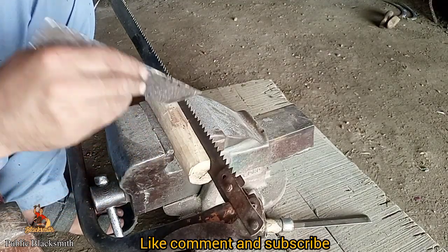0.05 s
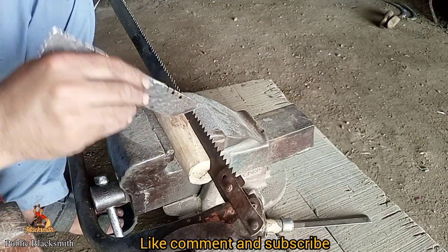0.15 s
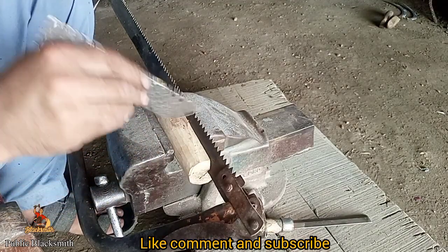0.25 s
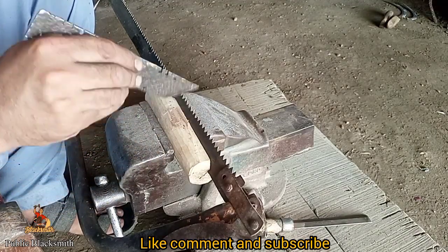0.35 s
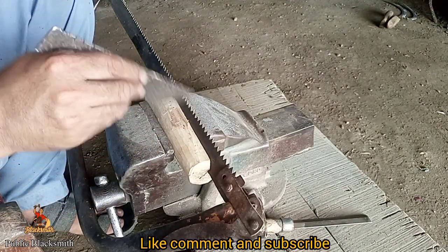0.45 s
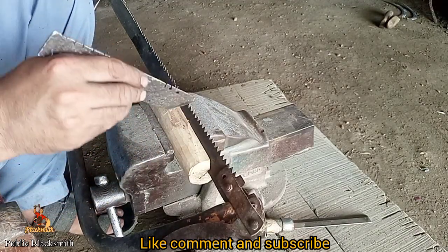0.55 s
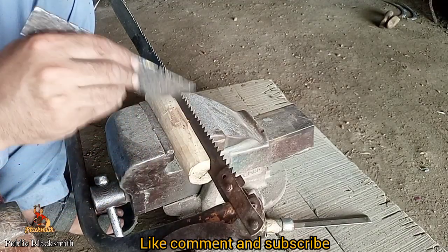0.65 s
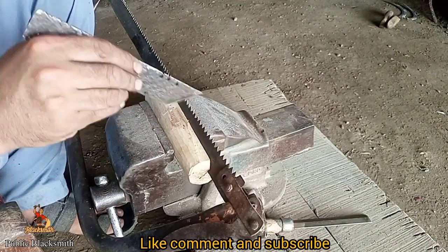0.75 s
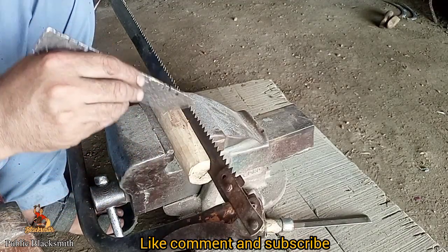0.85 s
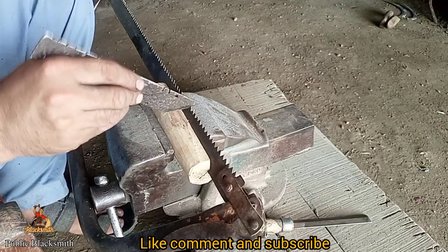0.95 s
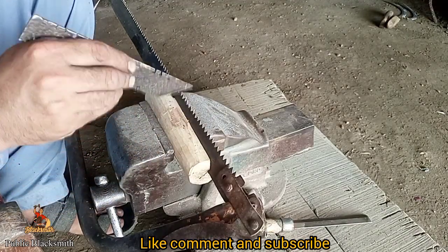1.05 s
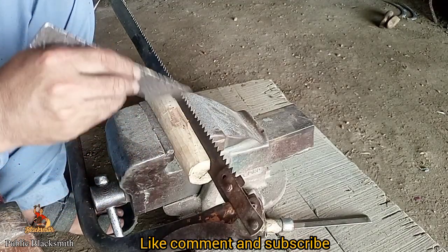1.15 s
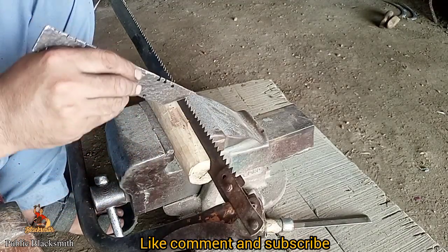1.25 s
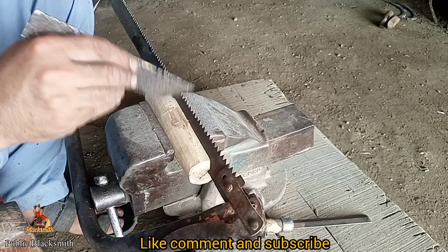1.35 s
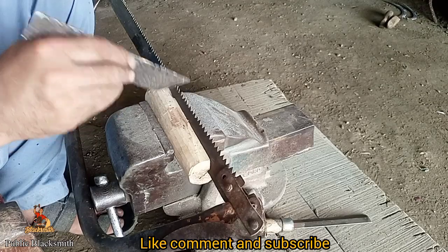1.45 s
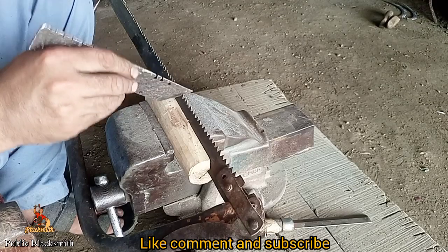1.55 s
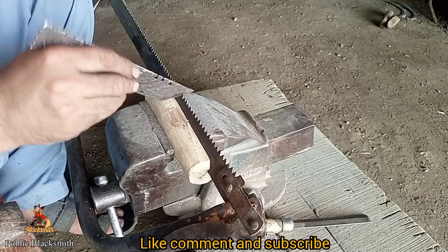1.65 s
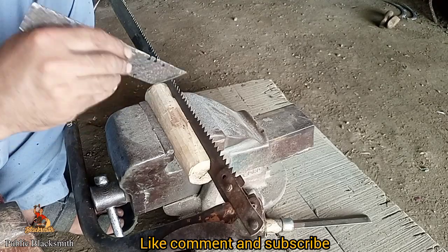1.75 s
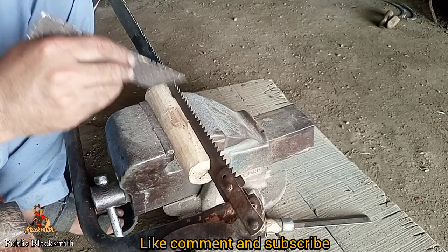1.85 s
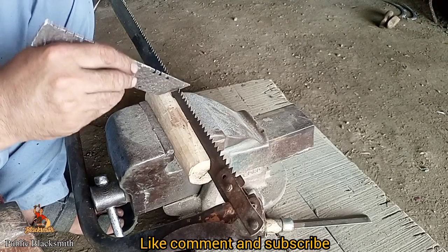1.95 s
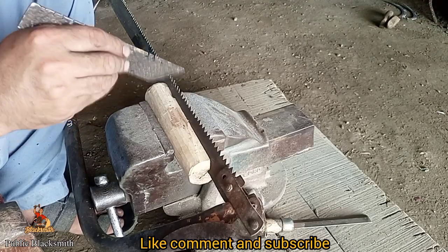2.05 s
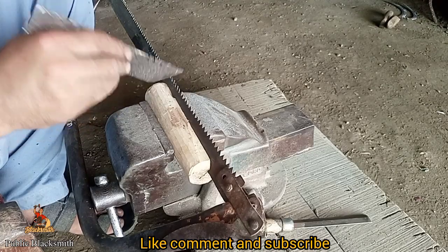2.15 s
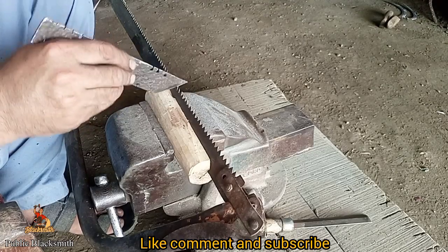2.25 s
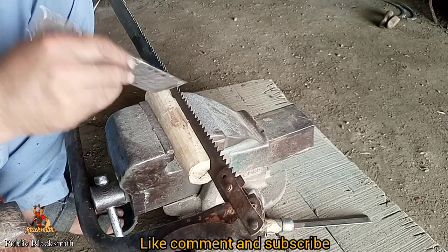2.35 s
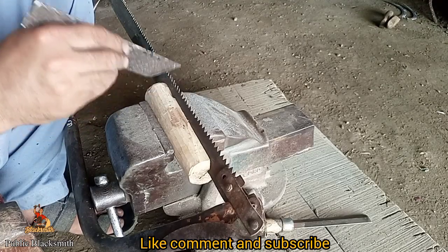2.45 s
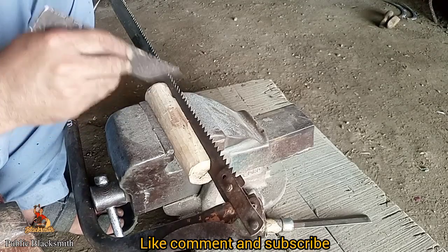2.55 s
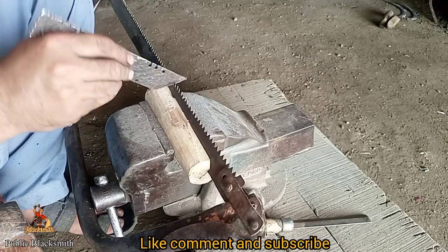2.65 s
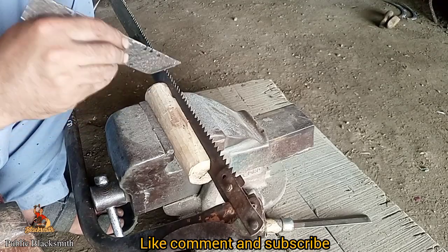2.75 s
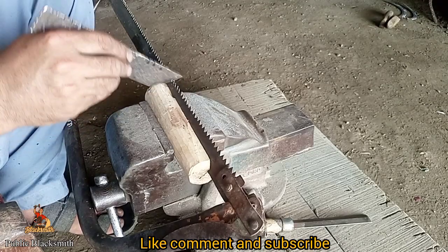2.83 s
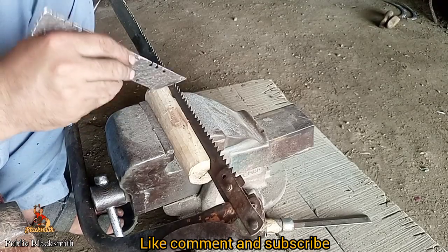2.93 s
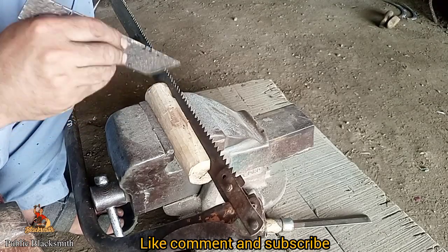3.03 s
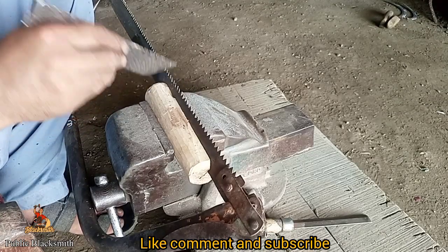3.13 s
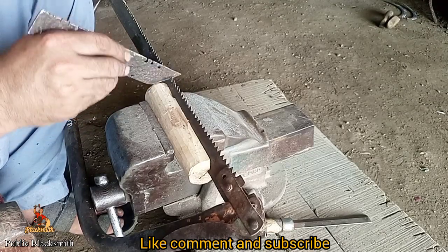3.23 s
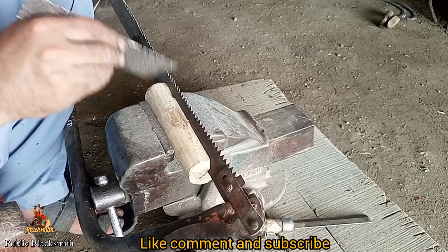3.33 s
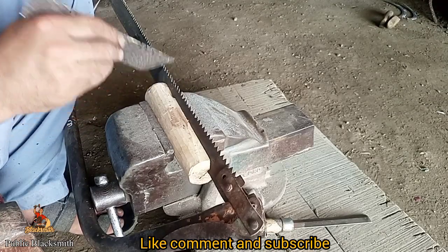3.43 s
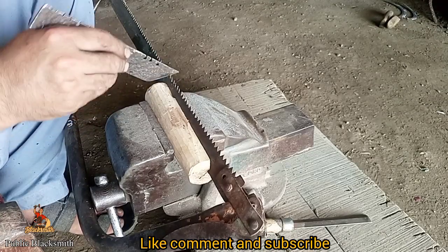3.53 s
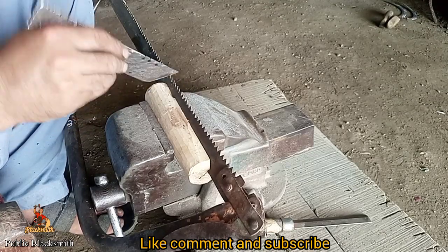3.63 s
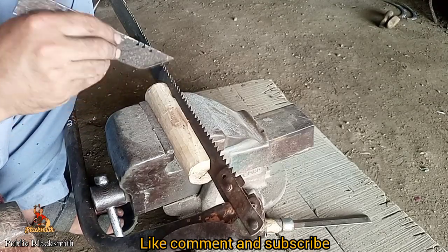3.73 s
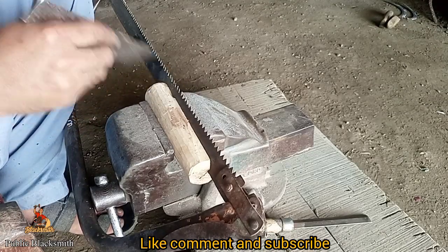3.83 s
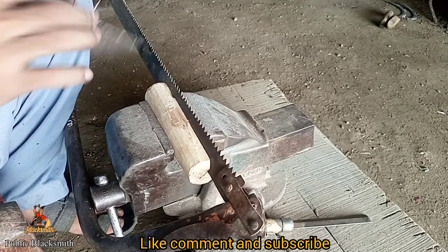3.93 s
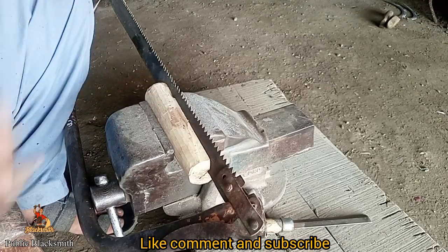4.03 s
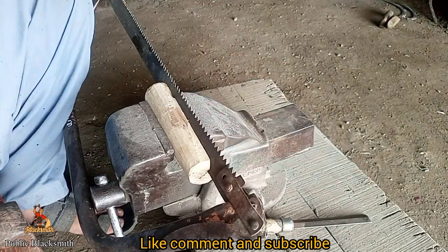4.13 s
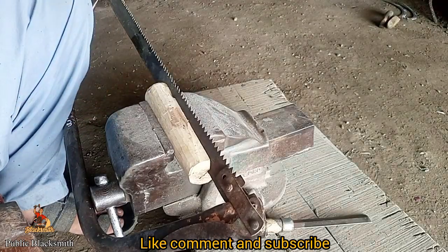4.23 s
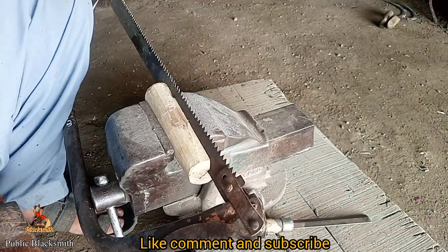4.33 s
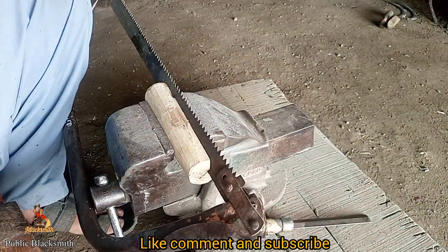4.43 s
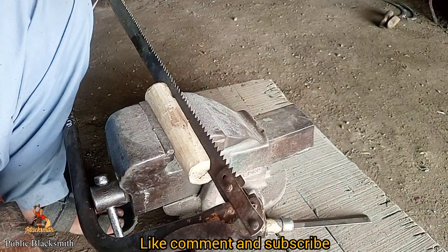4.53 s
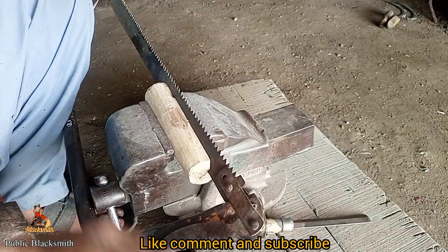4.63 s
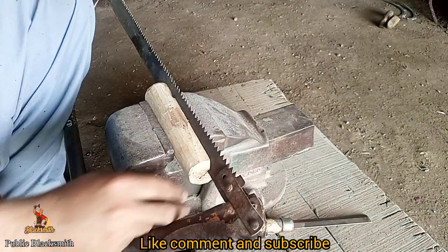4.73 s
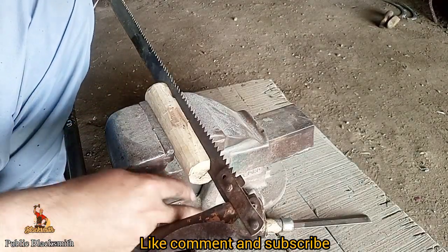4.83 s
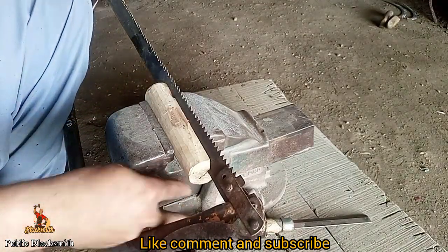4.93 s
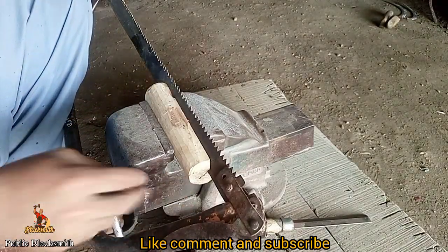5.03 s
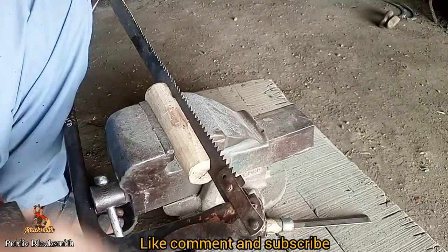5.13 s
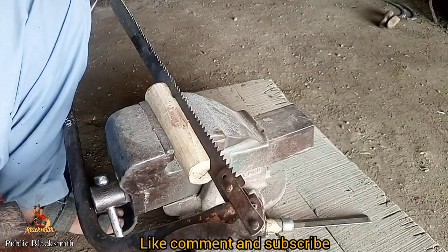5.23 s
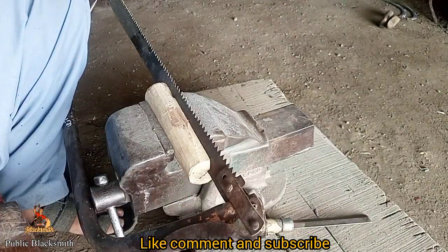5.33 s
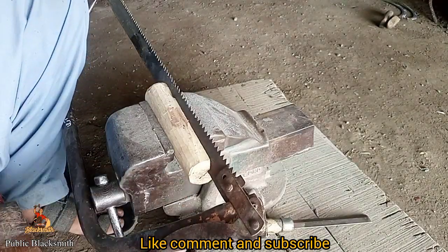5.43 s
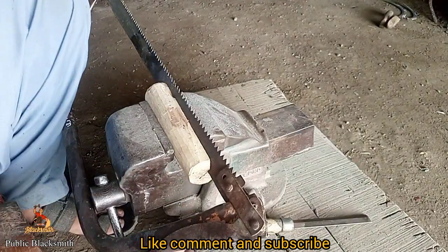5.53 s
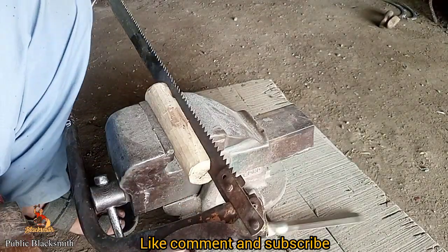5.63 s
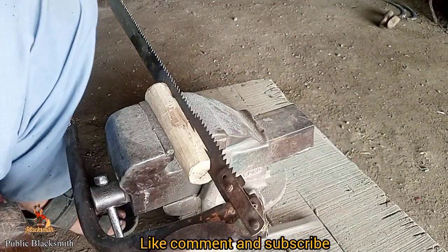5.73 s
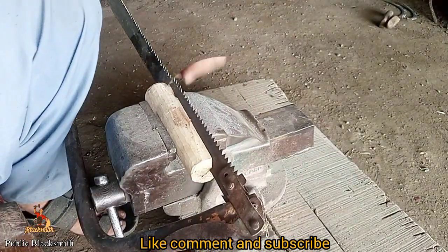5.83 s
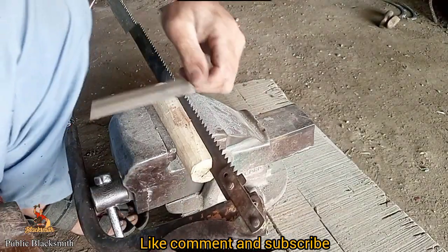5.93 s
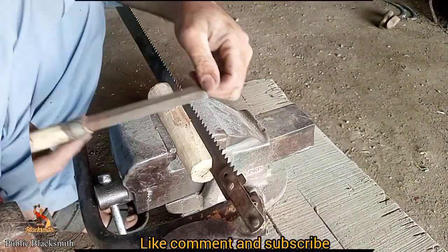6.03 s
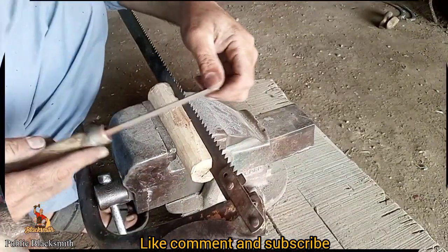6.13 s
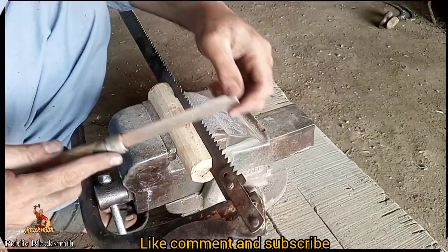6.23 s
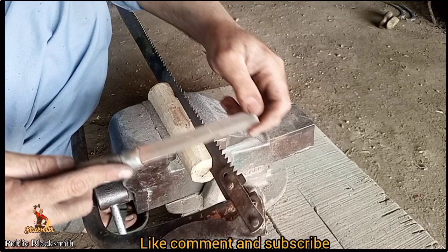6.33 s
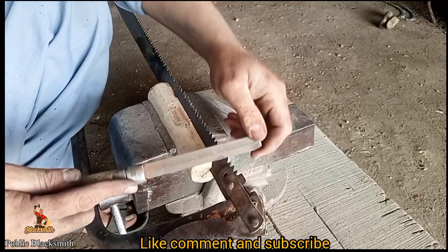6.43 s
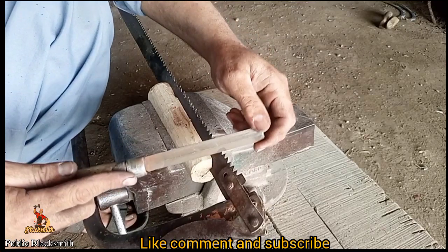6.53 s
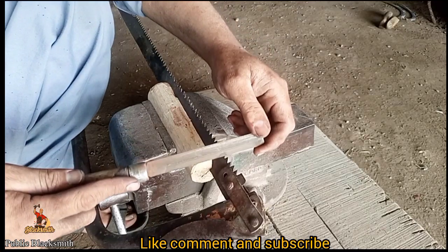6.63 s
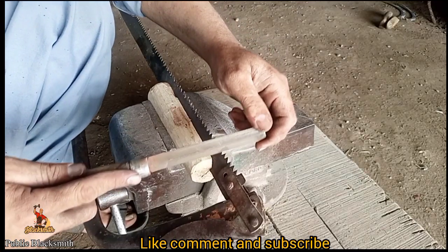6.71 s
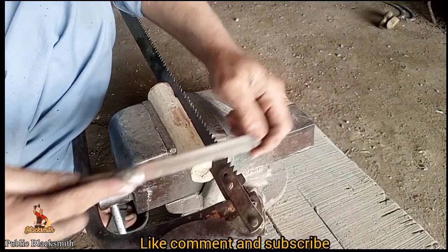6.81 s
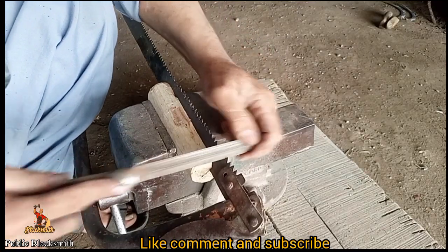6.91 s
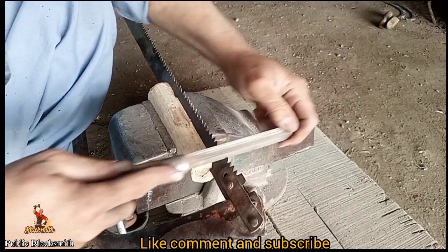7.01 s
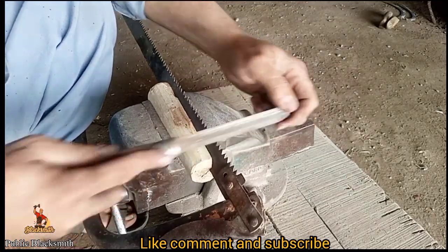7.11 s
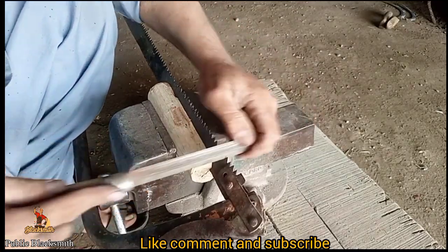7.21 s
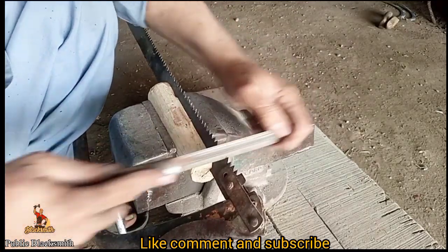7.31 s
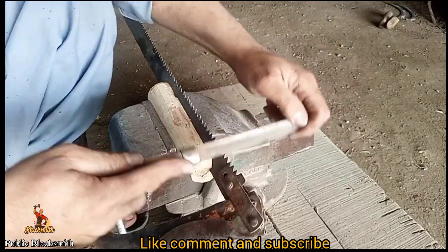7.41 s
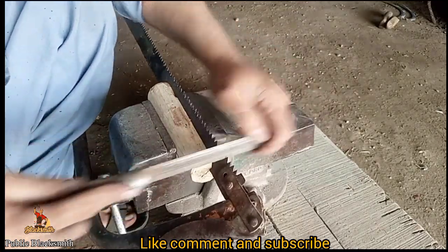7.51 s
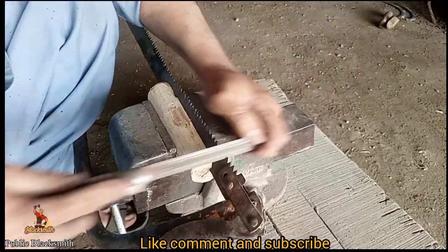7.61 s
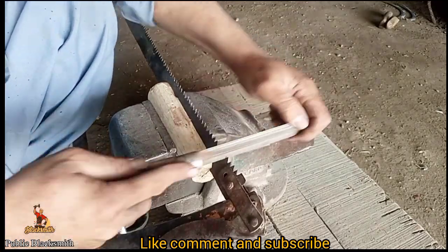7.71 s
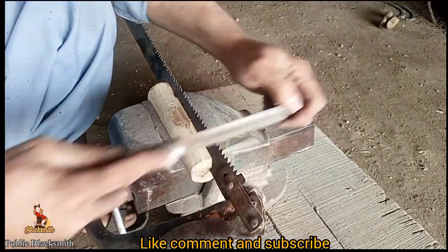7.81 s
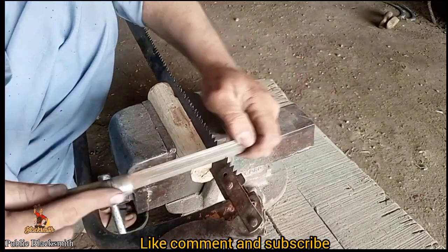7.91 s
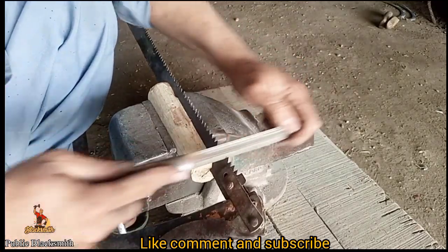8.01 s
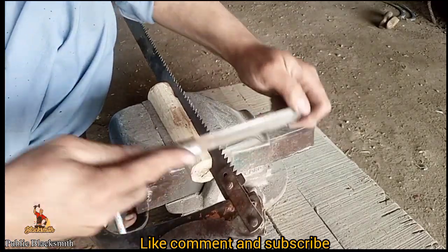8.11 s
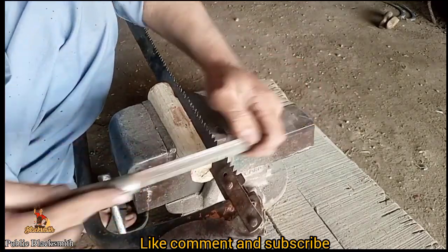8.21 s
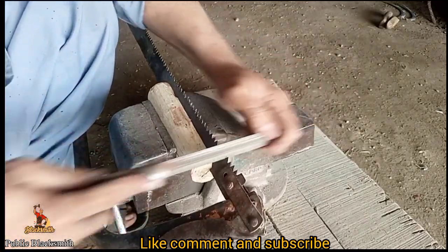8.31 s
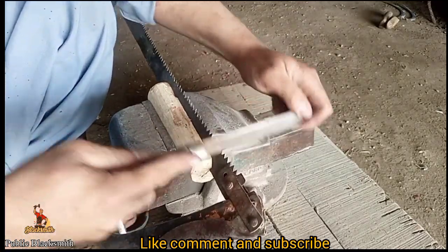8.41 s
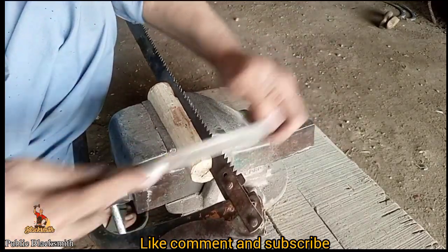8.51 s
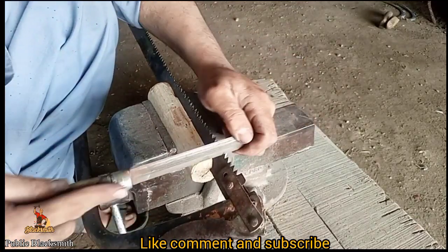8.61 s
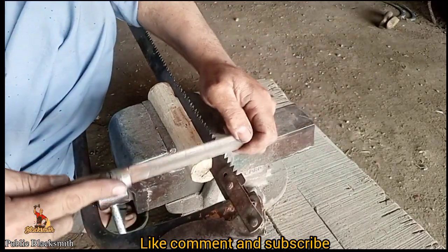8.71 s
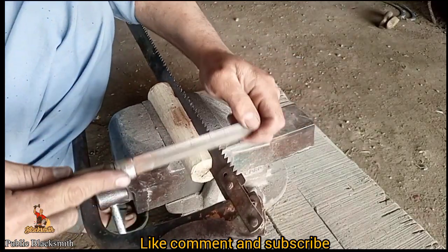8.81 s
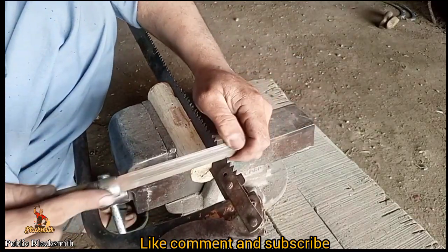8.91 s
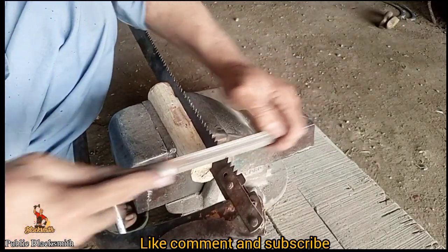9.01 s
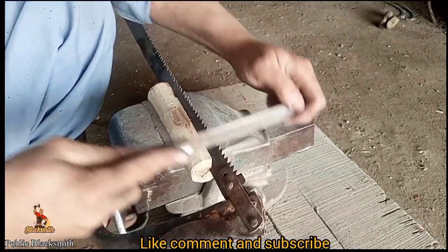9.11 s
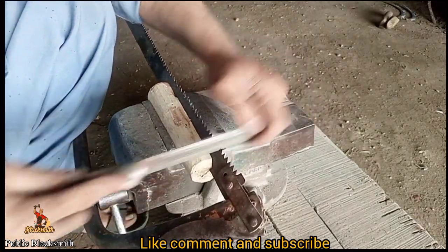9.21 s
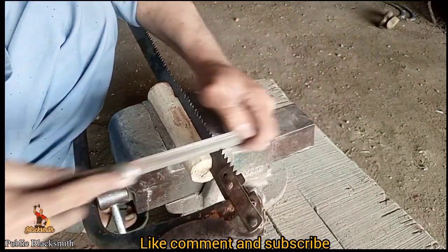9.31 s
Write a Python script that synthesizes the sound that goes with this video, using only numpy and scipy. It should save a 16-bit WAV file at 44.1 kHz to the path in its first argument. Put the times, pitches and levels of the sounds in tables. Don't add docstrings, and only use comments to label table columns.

```python
import sys
import numpy as np
from scipy import signal
from scipy.fft import rfft, irfft, next_fast_len
from scipy.io import wavfile
from scipy.ndimage import map_coordinates

SR = 44100
rng = np.random.default_rng(int(sys.argv[2]) if len(sys.argv) > 2 else 0)


def volts_from_db(level):
    exponent = np.asarray(level, float) / 20
    return 10 ** exponent


def persist_wave(psi):
    counts = np.round(np.clip(psi, -1, 1) * 32767).astype(np.int16)
    wavfile.write(sys.argv[1], SR, np.atleast_2d(counts).T)


N = 412776
SPAN = 12288
HZ = np.fft.rfftfreq(SPAN, 1 / SR)


def unit(x):
    return x / np.sqrt(np.mean(x ** 2) + 1e-30)


def along(points, hz):
    point_hz, point_db = np.transpose(points)
    return np.interp(np.log(hz + 1), np.log(point_hz + 1), point_db)


def add(track, start_s, piece):
    part = track[round(start_s * SR):][:len(piece)]
    part += piece[:len(part)]


def wobble(count, rate_hz):
    knots = rng.standard_normal(count // 20 + 8)
    return map_coordinates(knots, [np.arange(count) * rate_hz / SR])


def smooth(x, time_s):
    step = 1 / (time_s * SR)
    return signal.lfilter([step], [1, step - 1], x)


def noise(points):
    count = next_fast_len(N)
    colour = volts_from_db(along(points, np.fft.rfftfreq(count, 1 / SR)))
    return unit(irfft(rfft(rng.standard_normal(count)) * colour, count)[:N])


def rough(hz, t, depth):
    level = volts_from_db(3.5 * depth * wobble(len(t), 170))
    return level * np.sin(2 * np.pi * hz * t + 1.2 * depth * wobble(len(t), 160))


def modes(table, sharp):
    mode_hz, width_hz, db = np.transpose(table)[:, :, None]
    width_hz = width_hz / sharp / (1 + (HZ / mode_hz / 1.7) ** 4)
    sign = (-1) ** np.arange(len(mode_hz))[:, None]
    damping = 1j * HZ * width_hz
    return volts_from_db(db) * sign * damping / (mode_hz * mode_hz - HZ * HZ + damping)


def bands():
    vice = 1 / (1 + (HZ / 1100) ** 20)
    teeth = 1 - 1 / (1 + (HZ / 2300) ** 8)
    return np.array([vice, 1 - vice - teeth, teeth])


def body(grit, table, ring_db, sharp, small_db, scatter_db, favour_db):
    small_hz, small_width_hz = np.sort(rng.uniform(500, 15500, size=70)), rng.uniform(20, 60, size=70)
    small = modes(np.column_stack([small_hz, small_width_hz, np.zeros(70)]), 1)
    main, colour, split = modes(table, sharp), volts_from_db(along(grit, HZ)), bands()

    def response(rung):
        near = 1 + volts_from_db(small_db + 4.5 * rng.standard_normal(len(small))) @ small
        near *= volts_from_db(1.5 * rng.standard_normal() / (1 + (8500 / (HZ + 1)) ** 8))
        near += sum(volts_from_db(favour_db) * modes([row], 1)[0] for row in rung)
        ring = volts_from_db(ring_db + scatter_db * rng.standard_normal(len(main))) @ main
        share = split * (colour * near + ring)
        return share / np.sqrt(np.mean(abs(share) ** 2, axis=1, keepdims=True))
    return response


def favoured(teeth, s, blade_db, width_hz):
    _, blade_hz, share_db, tooth_hz, tooth_db = min(teeth, key=lambda row: abs(row[0] - s))
    rung = [(blade_hz, 1.5 * width_hz, blade_db), (tooth_hz, width_hz, tooth_db)]
    if 6 < s < 6.2:
        rung.append((13000, 9000, 3))
    return min(share_db, -.6), rung


def scrape(level_db, vice_db, blade_db, rung, response, lumps_db, dulls):
    teeth_db = 10 * np.log10(np.clip(1 - volts_from_db(2 * blade_db), .05, 1))
    lumps = .65 * wobble(SPAN, 200) + 1.2 * wobble(SPAN, 1100)
    force = unit(rng.standard_normal(SPAN) * volts_from_db(lumps_db * lumps))
    top_db = teeth_db + 2.6 + dulls * (level_db - level_db.max())
    gain = volts_from_db([level_db + vice_db, level_db + blade_db, level_db + teeth_db, level_db + top_db])
    gain[0] = smooth(gain[0], .012) * volts_from_db(2.5)
    vice, blade, teeth = response(rung)
    top = 1 - 1 / (1 + (HZ / 8000) ** 12)
    paths = [vice, blade, teeth * (1 - top), teeth * top * (HZ < 15900)]
    return irfft((rfft(force * gain) * paths).sum(0))


def strokes(bites, returns, stop_s, *saw):
    out, t = np.zeros(N), np.arange(SPAN) / SR - .03
    for s, db, hold_s, t60_s, vice_db, tooth in bites:
        shape_db = 60 * np.minimum(t + .0008, 0) / .0062 - 60 * np.maximum(t - hold_s, 0) / t60_s
        shape_db += 4 * np.exp(-abs(t) / .005) - 1.9
        shape_db -= 2500 * np.maximum(t - stop_s, 0)
        add(out, s - .03, scrape(db + shape_db, vice_db, *tooth, *saw))
    t = t - .04
    ends_db = -6000 * np.maximum(-.05 - t, 0) - 2500 * np.maximum(t - .15, 0)
    for s, db, rise_s, t60_s, vice_db, tooth in returns:
        shape_db = np.where(t < 0, 60 * t / rise_s, -68 * t / t60_s) + ends_db
        shape_db += 1.6 * np.exp(-abs(t) / .008) - .6
        add(out, s - .07, scrape(db + shape_db, vice_db, *tooth, *saw))
    return out


def brief_tones(rows, fall_power):
    out, t = np.zeros(N), np.arange(SPAN) / SR - .08
    for s, hz, db, rise_s, fall_s in rows:
        power = np.where(t < 0, 1.6, fall_power)
        shape_db = -12 * abs(t / np.where(t < 0, rise_s, fall_s)) ** power
        add(out, s - .08, volts_from_db(db + 2.5 + shape_db) * np.hanning(SPAN) ** .2 * rough(hz, t, depth=.45))
    return out


def workshop(work):
    # hz, db_per_hz
    rumble = [(20, -27), (40, -17), (52, -14), (64, -2), (78, 0), (92, -10), (130, -30), (300, -120)]
    # hz, db_per_hz
    motor = [(60, -120), (88, -14), (100, -3), (110, 0), (122, -5), (140, -14), (200, -120)]
    # hz, db_per_hz
    hiss = [(80, -40), (135, -1.5), (200, .5), (270, -4.5), (315, -3.5), (370, -10.5), (620, -13),
            (1400, -18.5), (2800, -24.5), (5600, -27), (7200, -30), (8000, -45), (16500, -47)]
    t = np.arange(N) / SR
    swell_s, rise_s, fall_s = 1.35, .28, .24
    swell_db = 11.5 * np.exp(-((t - swell_s) / np.where(t < swell_s, rise_s, fall_s)) ** 2)
    idle_db, loaded_db, load_s = -72.5, -69.5, 3.5
    motor_db = idle_db + (loaded_db - idle_db) / (1 + np.exp((load_s - t) / .15)) + .55 * swell_db
    hum = volts_from_db(-74 + swell_db) * noise(rumble) + volts_from_db(motor_db) * noise(motor)
    loud = smooth(work ** 2, .04)
    duck_db = .3 - 1.9 * loud / (loud + volts_from_db(-135))
    return hum + volts_from_db(-70 + duck_db + .6 * wobble(N, 8)) * noise(hiss)


def plate_flicks():
    # start_s, level_db, hold_s, t60_s
    plate_in = [(.0372, -36.2, .002, .156), (.1801, -32.5, .005, .096), (.3168, -34.4, .009, .1),
                (.452, -35.8, .01, .104), (.5955, -36.1, .013, .107), (.7387, -33.1, .007, .103),
                (.878, -40.7, .004, .098), (1.0178, -37.2, .019, .063), (1.1548, -33.5, .001, .098),
                (1.2882, -35.3, .008, .08), (1.4368, -36.1, .01, .085), (1.5809, -35.9, .008, .092),
                (1.7139, -35.6, .007, .121), (1.8671, -34.8, .004, .083), (2.0063, -39.4, .006, .096),
                (2.1495, -38.4, .009, .119), (2.2923, -34.1, .003, .08), (2.4356, -33.9, .001, .091),
                (2.5706, -36.8, .007, .075), (2.7035, -36.6, .009, .097), (2.8464, -36.5, .002, .153),
                (3.0057, -33.6, .011, .051), (3.1459, -35.5, .006, .075), (3.2804, -36.7, .016, .061),
                (3.4152, -35.6, .012, .085), (3.569, -42, .008, .094), (3.7038, -45.3, .009, .134),
                (3.8341, -36.4, .015, .132)]
    # peak_s, level_db, rise_60db_s, t60_s
    plate_back = [(.111, -55.5, .284, .054), (.243, -42.8, .048, .075), (.381, -51.4, .172, .089),
                  (.506, -44, .023, .109), (.659, -47.5, .034, .104), (.805, -50.9, .242, .083),
                  (.935, -48.3, .054, .101), (1.076, -45.5, .049, .089), (1.22, -49.4, .05, .095),
                  (1.314, -45.7, .069, .15), (1.502, -47, .058, .08), (1.636, -49.1, .033, .129),
                  (1.782, -42.5, .022, .086), (1.924, -56.7, .3, .179), (2.07, -58.7, .3, .097),
                  (2.204, -57.4, .244, .222), (2.35, -56.5, .182, .139), (2.497, -56.3, .255, .113),
                  (2.628, -52, .195, .113), (2.78, -53.6, .3, .065), (2.922, -54.1, .058, .03),
                  (3.057, -53.5, .189, .101), (3.2, -50.5, .199, .095), (3.344, -47.5, .175, .086),
                  (3.477, -46.8, .154, .121), (3.635, -62.5, .3, .062), (3.775, -54.6, .051, .064),
                  (3.9, -45.7, .031, .132)]
    # start_s, blade_hz, blade_share_db, tooth_hz, tooth_ring_db
    teeth = [(0.037, 1280, -5.1, 2340, 1.5), (0.18, 2230, -9.6, 4030, 1.7), (0.317, 1250, -5.9, 6660, 2.0),
             (0.452, 1660, -8.2, 4090, 9.8), (0.595, 1660, -6.8, 2560, 0.6), (0.738, 1290, -5.8, 3500, 2.9),
             (0.878, 1280, -3.3, 6330, 1.5), (1.018, 1660, -6.8, 4100, 5.4), (1.154, 1290, -9.7, 4100, 1.9),
             (1.288, 1240, -11.0, 4100, 2.1), (1.436, 1290, -7.3, 4070, -0.7),
             (1.58, 1290, -11.2, 4830, 4.6), (1.714, 1260, -8.8, 5320, 1.3), (1.867, 1270, -8.4, 4110, 3.4),
             (2.006, 1370, -8.6, 3050, -0.6), (2.149, 1280, -9.0, 4340, 6.5),
             (2.292, 1350, -10.2, 5040, 3.5), (2.435, 1260, -14.4, 6560, -0.2),
             (2.57, 1280, -10.7, 4110, 7.1), (2.703, 1500, -9.4, 4100, 10.0),
             (2.846, 1290, -8.1, 4100, 8.4), (3.005, 1650, -10.5, 4090, 5.9),
             (3.146, 1360, -10.2, 4100, 5.4), (3.28, 1380, -6.9, 4100, 10.1),
             (3.415, 1480, -6.8, 4100, 11.6), (3.569, 1380, -3.5, 4090, 3.3),
             (3.704, 1380, -4.5, 6010, -1.6), (3.834, 1400, -6.3, 2940, 2.6)]
    # time_s, vice_share_db
    hand = [(.04, -27), (.3, -19), (.76, -18), (.9, -29), (2.4, -28), (3.0, -28), (3.3, -25.5),
            (3.9, -24.5)]
    # hz, db_per_hz
    grit = [(260, -50), (450, -27), (718, -19), (850, -7), (1130, -19), (1290, -3), (1830, -8), (3290, -5),
            (4190, -2), (5330, -7), (6780, -4), (8370, -21), (12600, -34), (15100, -23.5), (16500, -40)]
    # mode_hz, width_hz, level_db
    wedge = [(330, 35, -22), (430, 45, -16), (560, 45, -16), (690, 50, -12), (810, 45, -6), (1075, 35, -9)]
    # mode_hz, width_hz, level_db
    saw_modes = [(1265, 60, -5), (1385, 50, -7), (1660, 42, -7), (2320, 110, -10), (2590, 74, -6),
                 (2890, 93, -8), (3050, 38, -8), (3490, 63, -8), (3680, 94, -6), (4100, 48, -5),
                 (4330, 30, -7), (5040, 35, -8), (5690, 210, -7), (6720, 180, -6), (7910, 55, -18),
                 (8460, 110, -23), (10500, 95, -24)]
    saw = body(grit, wedge + saw_modes, ring_db=4, sharp=1.3, small_db=3, scatter_db=2, favour_db=5)

    def tooth(s):
        return favoured(teeth, s, blade_db=2.5, width_hz=48)

    bites = [(s, *rest, np.interp(s, *np.transpose(hand)), tooth(s)) for s, *rest in plate_in]
    returns = []
    for s, db, *shape in plate_back:
        vice_db = -21 - .6 * (db + 50) + 1.3 * s
        returns.append((s, db, *shape, vice_db, tooth(s - .06)))
    return strokes(bites, returns, .17, saw, 1.8, .6)


def wedge_rocks():
    # peak_s, pitch_hz, peak_db, rise_12db_s, fall_12db_s
    rocks = [(0.192, 812, -57.0, 0.01, 0.02), (0.331, 802, -48.7, 0.01, 0.016),
             (0.463, 807, -53.0, 0.006, 0.016), (0.75, 802, -47.5, 0.006, 0.02),
             (1.453, 807, -55.1, 0.006, 0.008), (1.616, 791, -61.5, 0.022, 0.032),
             (1.656, 645, -59.9, 0.042, 0.012), (2.015, 764, -61.9, 0.05, 0.012),
             (2.219, 812, -63.6, 0.034, 0.012), (2.47, 812, -57.3, 0.014, 0.012),
             (2.602, 570, -61.9, 0.006, 0.012), (2.602, 807, -56.1, 0.026, 0.028),
             (2.742, 823, -57.7, 0.014, 0.016), (2.885, 565, -61.1, 0.01, 0.02),
             (2.889, 807, -56.5, 0.01, 0.032), (3.037, 812, -53.6, 0.014, 0.028),
             (3.161, 705, -61.2, 0.022, 0.032), (3.177, 823, -60.0, 0.022, 0.036),
             (3.332, 802, -58.7, 0.03, 0.016), (3.44, 403, -61, 0.01, 0.02),
             (3.472, 812, -55.6, 0.014, 0.044), (3.867, 436, -55.3, 0.018, 0.008),
             (3.891, 812, -51.8, 0.01, 0.032), (6.976, 446, -59.3, 0.014, 0.008),
             (7.623, 457, -48.9, 0.01, 0.016), (7.758, 457, -56.4, 0.034, 0.016),
             (7.966, 441, -58.3, 0.006, 0.012), (8.054, 457, -59.2, 0.018, 0.032),
             (8.297, 441, -57.5, 0.006, 0.008), (8.62, 436, -48.7, 0.006, 0.008),
             (8.644, 796, -50.4, 0.01, 0.02), (9.343, 479, -56.5, 0.014, 0.008)]
    faint = [(5.85, 2420, -67, .006, .035), (3.92, 1210, -63, .01, .05), (8.86, 600, -69, .07, .03),
             (6.75, 310, -71, .09, .2), (6.42, 310, -71, .09, .07)]
    return brief_tones(rocks + faint, .75)


def plate_drop():
    # start_s, peak_db, thud_db, clink_db
    bounces = [(4.5446, -42, -26, -24), (4.571, -33, -4, -23), (4.5785, -32, -5, -17),
               (4.6052, -29, -18, -7), (4.6264, -35, -10, 3), (4.6394, -35, -6, -7), (4.6524, -35, -13, -4),
               (4.6675, -31, -16, 0), (4.6874, -36, -10, -1.5), (4.7027, -32.5, -17, -16),
               (4.7217, -33, -22, -19)]
    # start_s, low_hz, high_hz
    bounce_modes = [(4.5446, 1640, 2840), (4.571, 1370, 2520), (4.5785, 1360, 4100), (4.6044, 1490, 2600),
                    (4.6264, 1750, 4000), (4.6394, 800, 6030), (4.6524, 1780, 3800), (4.6683, 1490, 6700),
                    (4.6874, 3050, 4200), (4.7027, 1610, 6050), (4.7217, 1510, 3280)]
    # hz, db_per_hz
    bench = [(200, -30), (340, -7), (800, -6), (1500, -3), (3000, -9), (4500, -13), (6200, -24),
             (8000, -43), (12500, -74), (15000, -41), (16500, -120)]
    # mode_hz, width_hz, level_db
    sheet_modes = [(339, 35, -3), (797, 90, 1), (1500, 50, 0), (1750, 27, -4), (2310, 65, -11),
                   (2520, 160, -8), (3060, 90, -9), (4120, 30, -4.5), (4460, 33, -15), (5230, 110, -18),
                   (5570, 47, -10), (6030, 50, -14), (6560, 220, -18), (7100, 38, -13), (7930, 50, -22),
                   (8740, 32, -30), (9820, 71, -35), (10500, 40, -34), (11500, 52, -47)]
    out, t = np.zeros(N), np.arange(SPAN) / SR - .02
    sheet = body(bench, sheet_modes, ring_db=7, sharp=1.5, small_db=-.6, scatter_db=2.6, favour_db=10.5)
    for (s, db, thud_db, clink_db), (_, low_hz, high_hz) in zip(bounces, bounce_modes):
        blow = rng.standard_normal(SPAN) * volts_from_db(-60 * t / .006) * (t >= 0)
        parts = irfft(rfft(blow) * sheet([(low_hz, 80, 1), (high_hz, 220, 2)]))
        parts /= abs(parts).max(1, keepdims=True)
        add(out, s - .02, volts_from_db([db + thud_db + 1.5, db - .7, db + clink_db + 4]) @ parts)
    rattle_db = np.where(t < 0, -140, -46 - 55 * t - 480 * np.maximum(t - .15, 0))
    thud_db, blade_db = -1.5 - 38 * t, -4.5 + 60 * np.minimum(abs(t - .085), .07)
    add(out, 4.571 - .02, scrape(rattle_db, thud_db, blade_db, [], sheet, 3.5, .35))
    return out


def plate_sings():
    # peak_s, pitch_hz, peak_db, rise_12db_s, fall_12db_s
    sings = [(4.615, 4110, -52, .025, .07), (4.612, 5570, -55, .004, .05), (4.642, 7095, -51, .012, .018),
             (4.692, 7095, -55, .012, .018), (4.692, 6040, -49, .05, .04), (4.685, 5520, -54, .012, .025),
             (4.765, 4090, -68, .02, .022), (4.728, 1490, -45, .006, .028)]
    return brief_tones(sings, 1.7)


def handle_knocks():
    # start_s, peak_db, low_hz, high_hz, high_over_low_db
    bumps = [(5.466, -58, 1730, 3600, 1.5), (6.089, -53, 2250, 3620, 6), (5.737, -43, 751, 1770, -6),
             (5.755, -47, 778, 1850, -17), (5.796, -46.5, 751, 1420, -9), (5.809, -53, 700, 1440, -11),
             (5.847, -46.5, 441, 2410, -18), (5.859, -46, 721, 2370, -19), (5.914, -46, 638, 1520, 14),
             (5.929, -56, 767, 1520, 11), (6.256, -67, 877, 1330, 1.5), (8.636, -39, 1360, 1990, -3),
             (5.797, -65, 4600, 3500, -2), (5.915, -62, 3250, 2500, -2)]
    out, t = np.zeros(N), np.arange(SPAN // 2) / SR
    dull = signal.butter(2, [500, 2200], 'band', fs=SR)

    def mode(hz, db):
        t60_s = .13 * (750 / hz) ** .5
        return volts_from_db(db - 60 * t / t60_s) * rough(hz, t, depth=.7)

    for s, db, low_hz, high_hz, lean_db in bumps:
        wood = mode(low_hz, -4 - max(lean_db, 0)) + mode(high_hz, -4 + min(lean_db, 0))
        decay = volts_from_db(-13 - 60 * t / .16) + volts_from_db(-18 - 60 * t / .012)
        puff = decay * signal.lfilter(*dull, rng.standard_normal(len(t)))
        add(out, s, volts_from_db(db + 1.5) * (wood + puff) * (1 - np.exp(-t / .0012)))
    return out


def steel_file():
    # start_s, level_db, hold_s, t60_s, vice_db
    landings = [(6.0902, -64, .003, .027, -17), (6.5019, -45.5, .001, .026, -18.6),
                (6.8885, -42.4, .035, .24, -24.5), (7.2635, -40.9, .014, .113, -16.7),
                (7.6026, -43.8, .036, .067, -12.5), (7.9395, -40.1, .018, .228, -19),
                (8.2837, -38.7, .001, .16, -15.7), (8.6074, -40.1, .002, .113, -9),
                (8.634, -37.5, .03, .09, -17), (8.9365, -41.3, .003, .155, -21.1),
                (9.3, -38.9, .033, .086, -14.4)]
    # peak_s, level_db, rise_60db_s, t60_s, vice_db
    skids = [(6.12, -46.5, .018, .115, -23), (8.7, -55, .1, .13, -12.3), (5.855, -68, .5, .2, -7),
             (5.47, -72, .03, .06, -18), (7.492, -55, .03, .09, -21), (8.89, -71, .2, .06, -21),
             (9.175, -54, .03, .05, -21)]
    # start_s, peak_s, end_s, peak_db, hold_power (1 fades at once)
    pushes = [(6.962, 7.017, 7.15, -35.5, .9), (7.325, 7.385, 7.475, -45.5, 2.6),
              (7.66, 7.725, 7.845, -45, 1.8), (8.012, 8.045, 8.19, -46, 2.3),
              (8.352, 8.41, 8.505, -45, 2.2), (9.02, 9.064, 9.185, -46, 2.6)]
    # way_from_peak (-1 start, 1 end), vice_db
    push_vice = [(-1, -14), (-.4, -14), (0, -12.5), (.35, -13.5), (.9, -18)]
    # start_s, blade_hz, blade_share_db, tooth_hz, tooth_ring_db
    land_teeth = [(6.09, 2200, -11.7, 3540, 4.3), (6.502, 1560, -4.8, 4800, -3.9),
                  (6.888, 1550, -3.0, 4430, 6.4), (7.263, 1530, -5.2, 2580, 2.3),
                  (7.603, 1410, -2.6, 5940, 3.8), (7.94, 1410, -6.1, 4240, 1.8),
                  (8.284, 1540, -5.3, 5990, 6.3), (8.607, 1630, -2.8, 2340, -2.1),
                  (8.632, 1350, -2.0, 4150, 1.6), (8.936, 1550, -5.4, 4240, 4.9),
                  (9.3, 1540, -4.5, 3320, 0.7)]
    skid_teeth = [(6.115, 1310, -7.0, 5930, 0.8), (8.69, 1360, -0.5, 3470, 2.1),
                  (7.48, 1550, -4.4, 7110, 9.5)]
    push_teeth = [(6.98, 2040, -6.9, 4960, 4.4), (7.34, 1360, -3.7, 2920, 0.9),
                  (7.69, 1360, -4.3, 2340, 0.9), (8.02, 1770, -4.7, 2900, 3.3),
                  (8.37, 1770, -4.1, 6000, 2.1), (9.03, 1790, -4.8, 2910, 2.2)]
    # hz, db_per_hz
    grit = [(180, -53), (300, -23), (449, -15), (671, -24), (987, -2), (1150, -16), (1380, -1), (2440, -7),
            (2930, -8), (5830, -10), (7020, -9), (7890, -24), (12800, -40), (14900, -25), (16500, -47)]
    # mode_hz, width_hz, level_db
    saw_modes = [(1370, 60, -3), (1550, 28, -2), (1930, 34, -4), (2340, 120, -7), (2580, 23, -7),
                 (2920, 71, -3), (3680, 42, -9), (3880, 33, -7), (4240, 200, -6), (4970, 88, -6),
                 (5930, 98, -5), (6280, 110, -11), (6850, 210, -8), (8240, 56, -24)]
    # mode_hz, width_hz, level_db
    wedge_hit = [(345, 30, -12), (447, 40, -6), (800, 45, -16), (975, 40, -1.5)]
    # mode_hz, width_hz, level_db
    wedge_push = [(447, 35, -19), (800, 40, -9), (975, 40, -1.5)]

    def tooth(s):
        return favoured(land_teeth + skid_teeth + push_teeth, s, blade_db=4, width_hz=55)

    saw = body(grit, wedge_hit + saw_modes, ring_db=-.6, sharp=.8, small_db=-.6, scatter_db=3, favour_db=5)
    bites = [(*row, tooth(row[0])) for row in landings]
    returns = [(*row, tooth(row[0])) for row in skids]
    out = strokes(bites, returns, .064, saw, 1.8, .5)

    saw = body(grit, wedge_push + saw_modes, ring_db=-1.5, sharp=1.1, small_db=-3, scatter_db=2.5,
               favour_db=2.5)
    start_db, end_db, lift_db_per_s = -63, -64, 950
    for start_s, peak_s, end_s, peak_db, holds in pushes:
        t = start_s - .03 + np.arange(SPAN) / SR
        before = np.clip((peak_s - t) / (peak_s - start_s), 0, 1)
        after = np.clip((t - peak_s) / (end_s - peak_s), 0, 1)
        db = peak_db + (start_db - peak_db) * before ** 1.8 + (end_db - peak_db) * after ** holds
        db = db - lift_db_per_s * (2 * np.maximum(start_s - t, 0) + np.maximum(t - end_s, 0))
        vice_db = np.interp(after - before, *np.transpose(push_vice))
        add(out, t[0], scrape(db, vice_db, *tooth(start_s + .02), saw, 1.9, .2))
    return out


def scene():
    work = plate_flicks() + wedge_rocks() + plate_drop() + plate_sings() + handle_knocks() + steel_file()
    return (work + workshop(work))[None]


def roll_off(x):
    return signal.sosfilt(signal.butter(12, 16790, fs=SR, output="sos"), x)


def record(dry):
    return roll_off(dry)


dry = scene()
out = record(dry)
persist_wave(out)
```